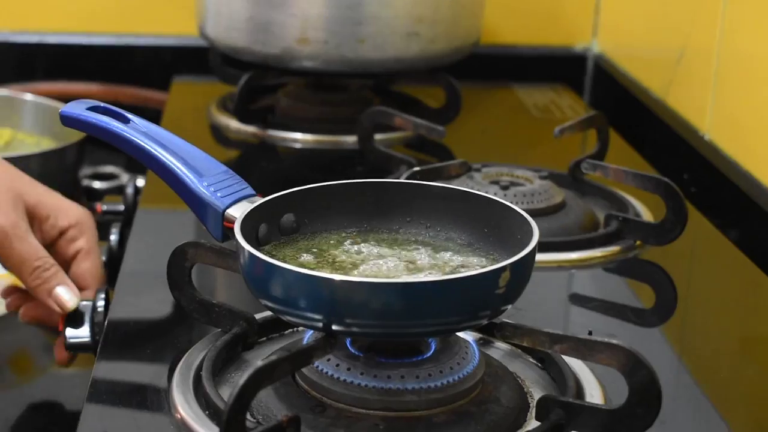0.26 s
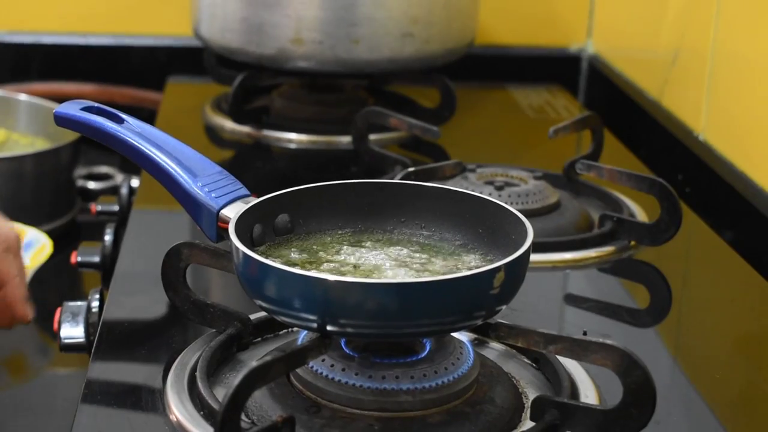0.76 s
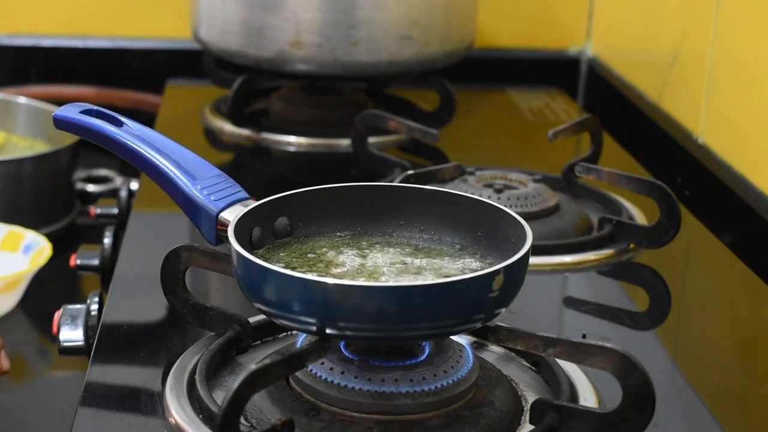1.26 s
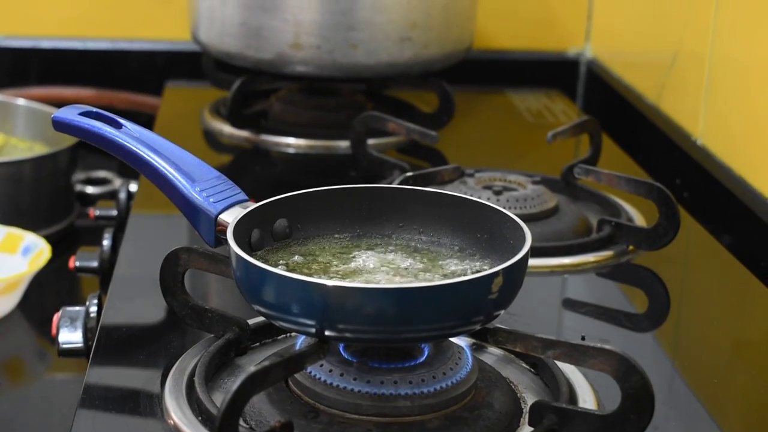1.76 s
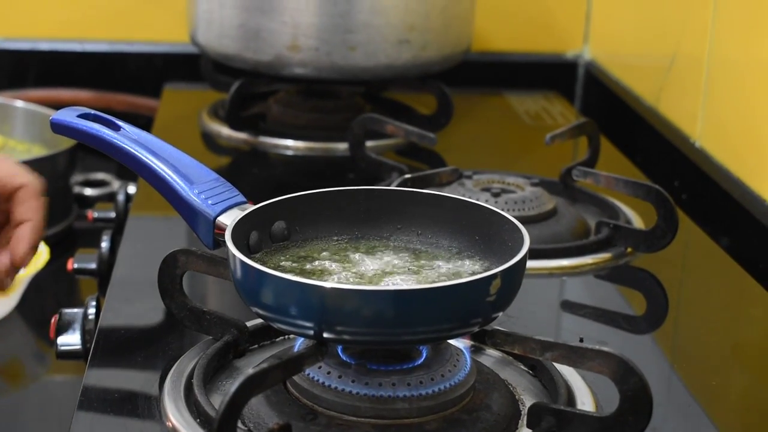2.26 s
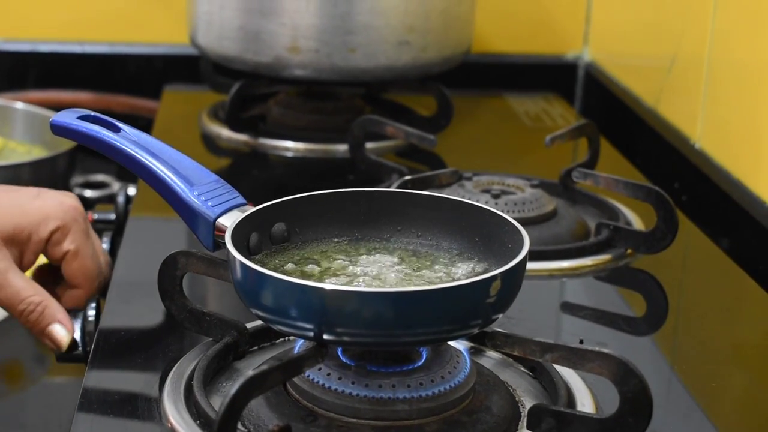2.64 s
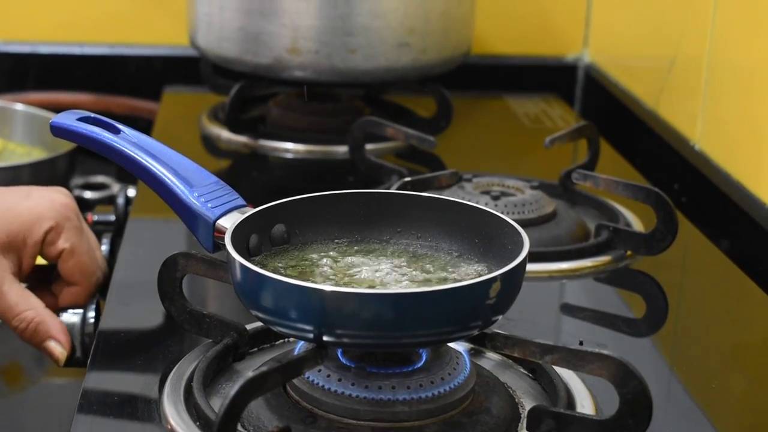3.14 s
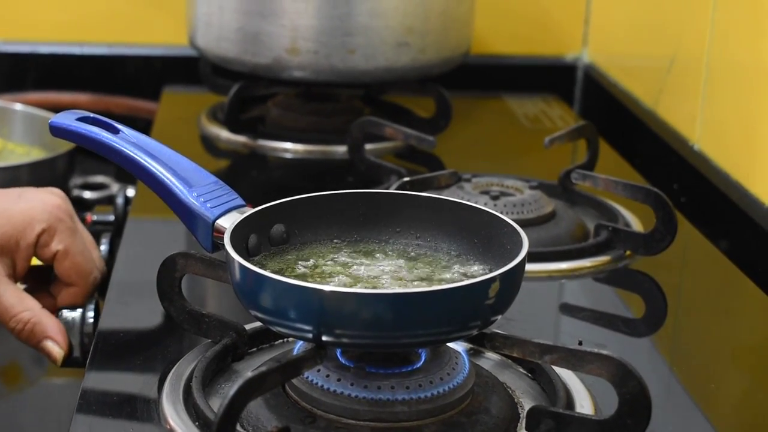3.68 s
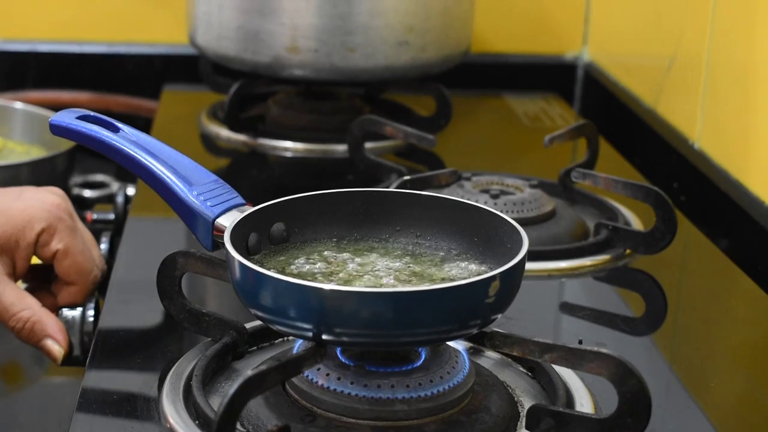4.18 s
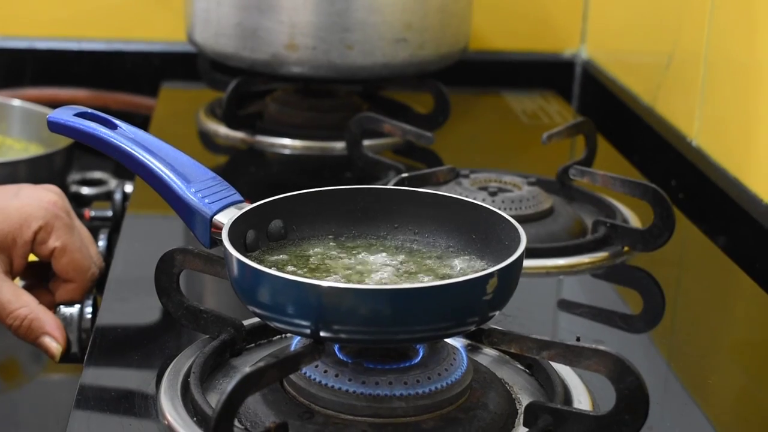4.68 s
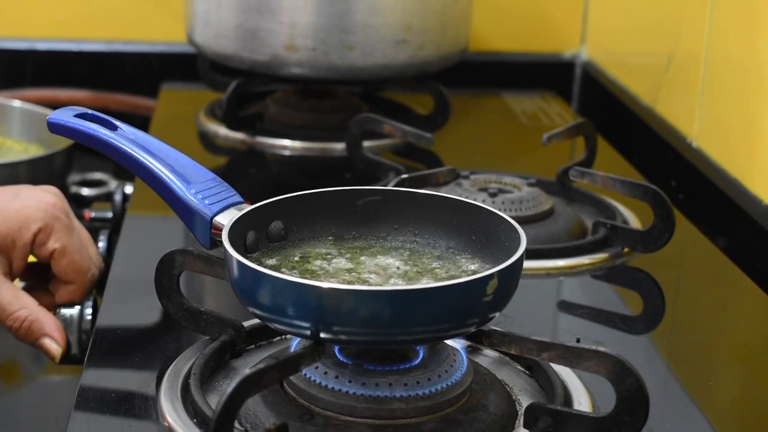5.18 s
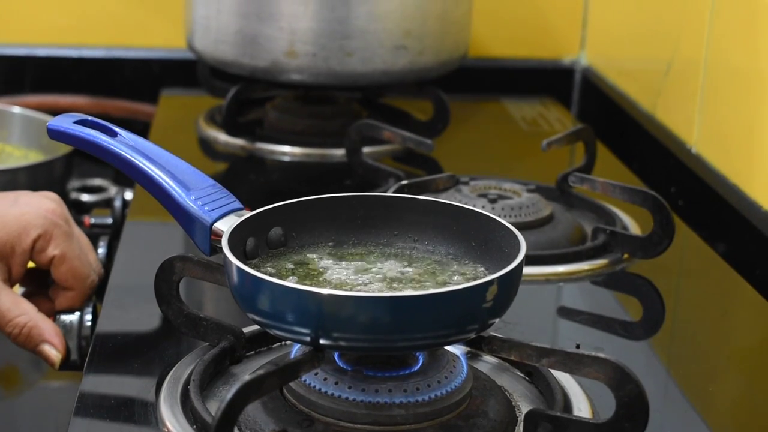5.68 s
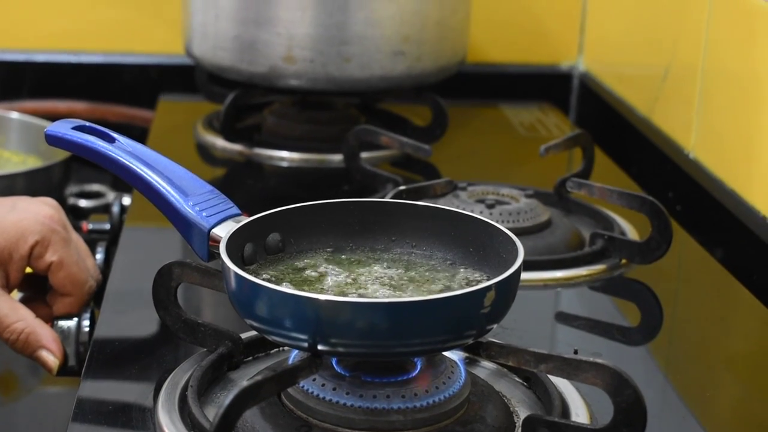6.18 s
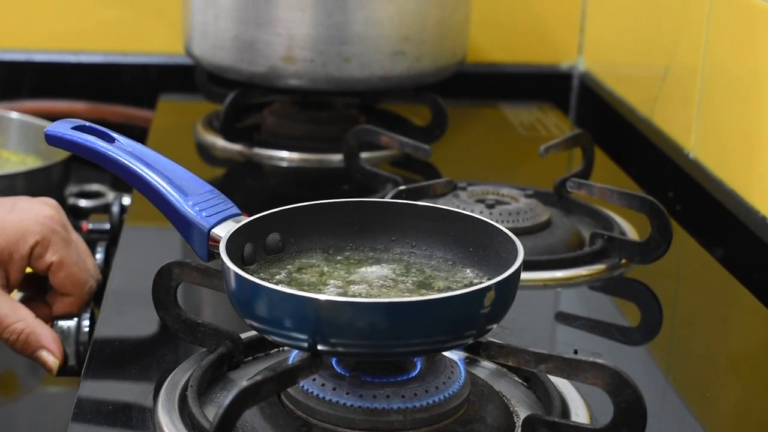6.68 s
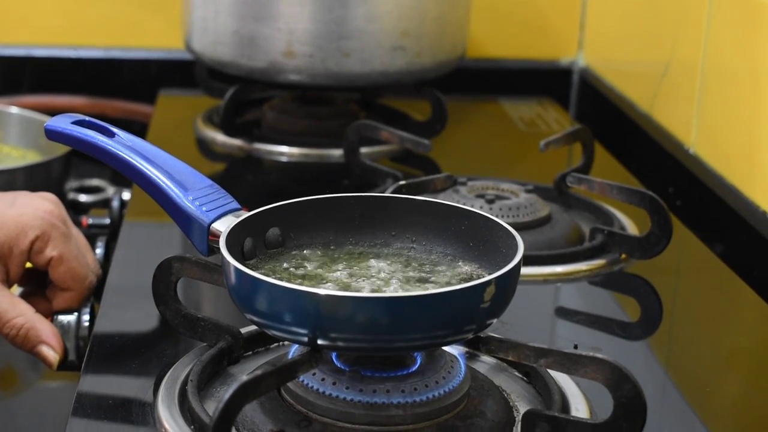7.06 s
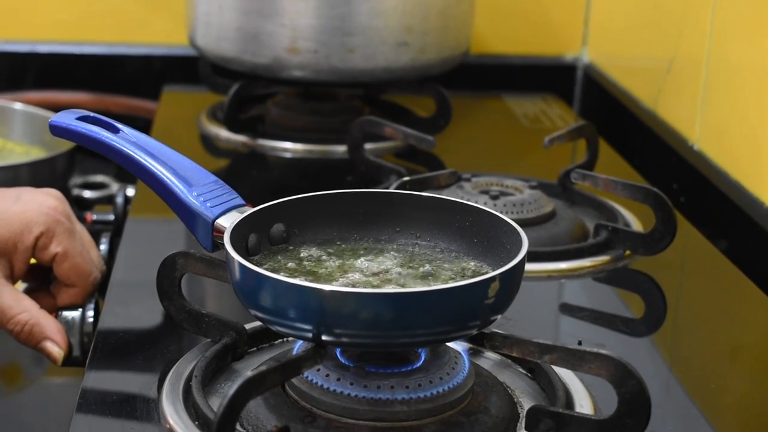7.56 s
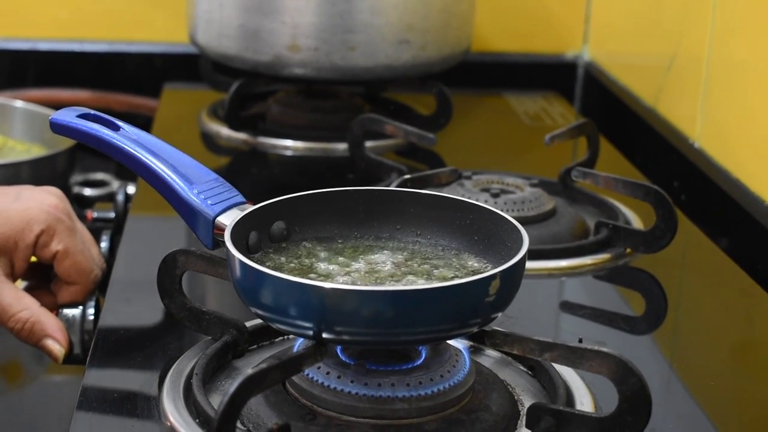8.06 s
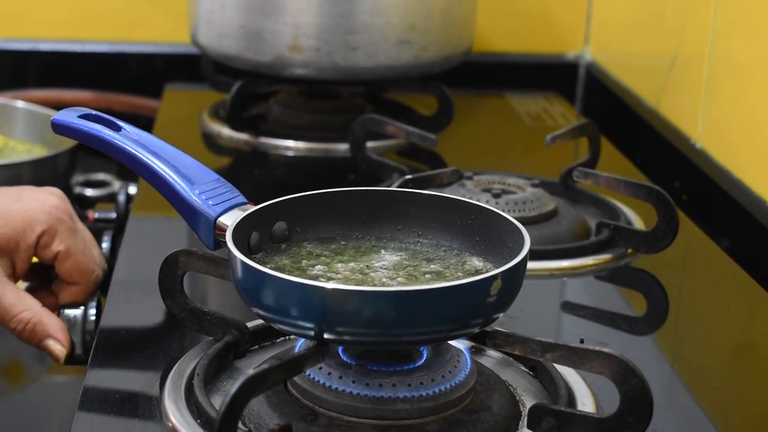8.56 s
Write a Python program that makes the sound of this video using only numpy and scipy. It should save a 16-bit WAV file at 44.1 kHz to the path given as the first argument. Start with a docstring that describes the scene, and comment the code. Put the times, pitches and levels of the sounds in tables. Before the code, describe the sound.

A gas flame rushes softly with a light hiss and a very faint hum, heard close up in a tiled kitchen. At about 0.3 seconds seeds start to crackle in hot oil, and a fine sizzle rises as the gas hiss drops away. Sharp, bright pops come irregularly, several a second, each ringing briefly in the small pan, with weaker crackles and tiny spits between them. Strong cracks stand out near 1.4, 3.1 and 4.4 seconds. A quick cluster of dull, quiet knocks sounds beside the stove at about 2 seconds, and a fainter one near 3. From about 5 to 7.5 seconds the gas whistles faintly as it is turned low, then returns to a slight hiss. The sizzle and small crackles gradually thin, but distinct pops continue, with sharp ones near 7 and 8 seconds, until the end at almost 9 seconds.

```python
"""A gas flame rushes softly over a faint hum; then seeds crackle in hot oil, close by in a tiled kitchen.
Each seed splits with a crack, its steam bubble rings in the oil, and the bowl of the small pan answers.
Weaker seeds, tiny spits and a fine sizzle fill the gaps and die down as the seeds dry.
The gas hisses or faintly whistles as the knob is turned, and a few dull knocks sound beside the stove."""
import sys
import numpy as np
from scipy import signal
from scipy.fft import rfft, irfft, next_fast_len
from scipy.io import wavfile

SR = 44100
rng = np.random.default_rng(int(sys.argv[2]) if len(sys.argv) > 2 else 0)


def log_audio(samples):
    """Write samples as a 16-bit WAV file to the path given in sys.argv[1]."""
    # one column per channel
    frames = np.atleast_2d(samples).T
    # limit to full scale, then quantise
    limited = np.clip(frames, -1, 1)
    pcm = np.round(limited * 32767).astype(np.int16)
    wavfile.write(sys.argv[1], SR, pcm)


N = 388962
TIME = np.arange(N) / SR
SEEDS_IN_S, FOAM_UP_S = 0.29, 0.17
TOP_HZ, TOP_AT_DB, TOP_DB_PER_OCTAVE = 10760, -13.5, 20  # a harder burst is quicker and reaches higher


def amp(db):
    """Decibels to amplitude ratio."""
    return 10 ** (np.asarray(db) / 20)


def unit_rms(x):
    """Normalises power to rms 1."""
    return x / np.sqrt(np.mean(x ** 2) + 1e-20)


def unit_burst(x):
    """Normalises energy to that of one millisecond at rms 1."""
    return x * np.sqrt(SR / 1000 / (np.sum(x ** 2) + 1e-20))


def curve_at(points, hz):
    """Interpolates along a log-frequency axis."""
    freq_hz, value = np.transpose(points)
    return np.interp(np.log(hz + 1), np.log(freq_hz), value)


def add(mix, start_s, sound):
    """Superposition: sums a sound into the mix."""
    part = mix[max(round(start_s * SR), 0):][:len(sound)]
    part += sound[:len(part)]


def coloured(x, spectrum):
    """Spectral shaping: filters x by a level curve, at rms 1."""
    size = next_fast_len(N)
    gain = amp(curve_at(spectrum, np.fft.rfftfreq(size, 1 / SR)))
    return unit_rms(irfft(rfft(x, size) * gain, size)[:N])


def burner(flame_db=-50.0, hiss_db=-47, hiss_power=1.3, whistle_db=-43.5, choke_db=43):
    """Flow noise: the flame is steady; the gas hisses with the valve open and whistles when nearly shut."""
    # noise spectra of flame and room, open valve and nearly shut valve: freq_hz, relative_db
    flame_spectrum = [(20, -31), (50, -21), (100, -17), (160, -8), (195, -1), (290, -2.5), (470, 5.5),
                      (560, 1), (690, 6), (850, 0), (1300, -4), (3000, -8), (8000, -26), (16000, -25)]
    hiss_spectrum = [(300, -32), (1400, -10), (1850, -2.5), (2300, -12.5), (4000, -12), (5900, -15.5),
                     (6400, -7), (7000, -12), (7900, -3.5), (8800, -10), (10500, -14), (13000, -19),
                     (16000, -32)]
    whistle_spectrum = [(1000, -27), (3000, -17), (3440, 0), (3750, 4), (4050, -20), (4500, -6),
                        (5400, -14), (16000, -51)]
    # the knob is turned down, nudged up, turned low and up again: time_s, opening_fraction
    valve = [(0, 0.95), (.3, 1), (.6, 0.18), (4.6, .3), (5, 0.09), (5.6, 0.01), (7.5, 0.09), (8.8, 0.4)]
    opening = np.clip(np.interp(TIME, *np.transpose(valve)), 0, 1)
    noise = rng.standard_normal((3, N))
    flame = amp(flame_db) * coloured(noise[0], flame_spectrum)
    hiss = amp(hiss_db) * opening ** hiss_power * coloured(noise[1], hiss_spectrum)
    whistle = amp(whistle_db - choke_db * opening) * coloured(noise[2], whistle_spectrum)
    return flame + hiss + whistle


def hum(drift_points=60):
    """Phase modulation: the low tones of an appliance wander a few times a second."""
    # partials of the hum: pitch_hz, level_db
    partials = [(99, -81), (146, -77), (197, -68), (243, -67.5), (344, -65), (463, -64.5), (689, -65)]
    drift = signal.resample(rng.standard_normal((len(partials), drift_points)), N, axis=1)
    return sum(amp(db) * unit_rms(np.sin(2 * np.pi * hz * TIME + phase))
               for (hz, db), phase in zip(partials, drift))


def frying(bare_oil_db=-25, drying_db_per_s=0.73):
    """Evaporation envelope: the oil foams up as the seeds go in, then calms exponentially as they dry."""
    since_s = TIME - SEEDS_IN_S
    foam = np.clip(since_s / FOAM_UP_S, 0, 1) ** 2
    return amp(bare_oil_db) + foam * amp(-drying_db_per_s * since_s)


def sizzle(db=-46.0, per_s=1500):
    """Shot noise: countless foam bubbles burst as fine, independent clicks."""
    # spectrum of the foam: freq_hz, relative_db
    foam_spectrum = [(300, -54), (900, -0.5), (1300, -1.5), (1570, 0.5), (2000, -1.5), (2800, -2.5),
                     (3600, -9), (4500, -5.5), (5600, -12), (7500, -7.5), (10000, -6), (13000, -10),
                     (16000, -14.5)]
    clicks = rng.choice([-1, 1], N) * (rng.random(N) < per_s / SR)
    return amp(db) * coloured(clicks, foam_spectrum) * frying()


def crack(hz, top_hz, q=1.0, tear_s=0.00079, snap=0.93, flattening=0.75, size=400):
    """Brittle fracture: the husk snaps and tears in a broadband pulse; a slow break lacks the top treble."""
    t = np.arange(size) / SR
    tear = rng.standard_normal(size) * np.exp(-t / tear_s)
    tear[0] = snap
    spectrum = rfft(tear, 4 * size)
    spectrum /= (abs(spectrum) + 1e-9) ** flattening
    freq_hz = np.fft.rfftfreq(4 * size, 1 / SR) + 1
    husk_resonance = 1 / (1 + 1j * q * (freq_hz / hz - hz / freq_hz))
    s = 1j * freq_hz / top_hz
    lowpass = 1 / ((s + 1) * (s ** 2 + s + 1))
    return unit_burst(irfft(spectrum * husk_resonance * lowpass)[:size])


def bubble(hz, glide=0.0058, swell_cycles=0.28, decay_cycles=2.3, size=600):
    """Damped oscillator: a steam bubble swells, rings briefly and rises a little in pitch as it opens."""
    cycles = hz * np.arange(size) / SR
    fade = np.exp(-cycles / decay_cycles)
    swell = 1 - np.exp(-cycles / swell_cycles)
    return unit_burst(np.sin(2 * np.pi * cycles * (1 - glide * fade)) * fade * swell)


def bowl(rise_s=0.00056, damped_s=0.05, spread_db=2.5, oil_detune=0.022, size=6000):
    """Modal ringing: the seed's random place weights the pan's modes; moving oil detunes the damped ones."""
    # damped modes of the oil-filled bowl, then the longer ring of the wall: pitch_hz, level_db, t60_s
    pan_modes = [(1529, 1, 0.021), (1612, 1, 0.017), (1849, -2.5, 0.013), (1158, -12.5, 0.026),
                 (1290, -6.5, 0.01), (3516, -11, 0.017), (1498, -23.5, 0.11), (1577, -25.5, 0.35),
                 (2442, -22.5, 0.2), (1032, -28.5, 0.2)]
    hz, db, t60 = np.transpose(pan_modes)[:, :, None]
    t = np.arange(size) / SR
    weight, phase, detune = rng.standard_normal((3, len(pan_modes), 1))
    hz = hz * (1 + oil_detune * detune * (t60 < damped_s))
    modes = amp(db + spread_db * weight - 60 * t / t60) * np.sin(2 * np.pi * hz * t + phase)
    return unit_burst(modes.sum(0) * (1 - np.exp(-t / rise_s)))


def pop(db, hz, bubble_share, bowl_db, thin_rise=2.24):
    """Energy partition: one burst is shared between crack and bubble, and the pan answers."""
    share = np.clip(bubble_share, 0.02, 0.97)
    crack_hz = hz * (1 + thin_rise * share ** 2)  # more bubble leaves a thinner, higher crack
    top_hz = max(hz, TOP_HZ * 2 ** ((db - TOP_AT_DB) / TOP_DB_PER_OCTAVE))
    sound = amp(bowl_db) * bowl()
    add(sound, 0, amp(db) * np.sqrt(1 - share) * crack(crack_hz, top_hz))
    add(sound, 0, amp(db) * np.sqrt(share) * bubble(hz))
    return sound


def loud_seeds(place_count=7):
    """Point sources: the loud pops are dealt out over places in the pan, one track for each."""
    # bursting seeds, levels at the source: start_s, level_db, pitch_hz, bubble_share, bowl_db
    bursts = [(0.3009, -21.5, 6090.0, 0.88, -47), (0.4446, -18, 11670.0, 0.13, -32),
              (0.4891, -22.5, 3330, 0.2, -25.5), (0.5371, -22, 1910, 0.16, -19),
              (0.5755, -18, 2930, 0.9, -20.0), (0.5838, -15, 1920, 0.1, -19), (0.6075, -31, 3350, 0.8, -19),
              (0.7112, -27, 4040.0, 0.05, -22), (0.874, -19.5, 3520.0, 0, -25),
              (0.9202, -19.5, 2770.0, 0.06, -25), (0.9515, -21, 3290.0, 0.86, -38),
              (0.9619, -19.0, 3180.0, 0.93, -17), (1.0767, -23.5, 3500, 1, -29),
              (1.1062, -19.5, 3320, 0, -17.5), (1.2146, -15.5, 3180.0, 0, -24),
              (1.2781, -21.0, 3560, 0.95, -17), (1.3014, -14.5, 4790.0, 1, -22.5),
              (1.3675, -6.5, 3500, 0.14, -12), (1.3911, -15, 3400.0, 0.83, -21),
              (1.4945, -17, 2340, 0.1, -20), (1.577, -27, 3820, 0.3, -24.5),
              (1.7457, -22, 4180.0, 0.3, -32), (1.957, -10, 4000, 0.88, -27.5),
              (2.0157, -18, 2540, 0.66, -13), (2.1719, -23, 3520.0, 0.6, -17.5),
              (2.2022, -12.5, 3590, 0.99, -44.0), (2.3398, -21.5, 3440, 0.76, -24.5),
              (2.3749, -21.5, 2660, 0.2, -20.0), (2.5903, -24, 3380, 0.45, -22),
              (2.758, -18.5, 3550, 0.2, -21.5), (2.8097, -13, 2360, 0.73, -8.0),
              (2.9155, -12.5, 3780, 0.94, -24.5), (3.1428, -5.5, 3120, 0.84, -19),
              (3.2525, -15.5, 3500, 0.45, -23.0), (3.2719, -20, 4180.0, 0.5, -14.5),
              (3.2972, -9, 4400, 0.18, -29), (3.418, -27, 5130.0, 0.5, -42),
              (3.5079, -12.0, 3460, 0.74, -14.5), (3.6288, -22.5, 2030.0, 0, -24.5),
              (3.6906, -23.5, 3480, 0.76, -24.5), (3.9613, -22.5, 4070, 0.5, -12.5),
              (4.1476, -21.5, 3470, 0.6, -25.5), (4.1918, -26.5, 2580, 0.9, -17.5),
              (4.2599, -13.5, 3730, 0.61, -26), (4.3814, -8, 10300, 0.25, -44.0),
              (4.4805, -15.0, 2430, 0.3, -16), (4.6056, -27, 3830, 0.2, -21),
              (4.7671, -21.0, 3960, 0.18, -23.0), (4.8728, -13, 12500.0, 0.25, -19),
              (5.0434, -16.0, 4000, 0.45, -30), (5.1503, -9.5, 3420, 0.96, -22.5),
              (5.2377, -12, 4000, 0.81, -30), (5.3626, -20.5, 4860, 0.64, -24.5),
              (5.3885, -13, 12200, 0.05, -17.5), (5.7166, -12.0, 4100, 0.19, -26),
              (6.0006, -20.5, 4060, 0.55, -17.0), (6.1009, -15, 3630, 0.27, -21.5),
              (6.2094, -20.5, 3700, 0.8, -19), (6.3547, -26.5, 3450, 0.7, -21),
              (6.5475, -24.5, 3870, 0.8, -28.5), (6.6468, -22.0, 2500.0, 0.87, -21.5),
              (6.8753, -16.5, 3520, 0.23, -18.5), (6.907, -21.0, 5800, 0.5, -11.0),
              (6.9931, -20, 3520.0, 0.8, -15.5), (7.0379, -9.5, 5270, 0.34, -19),
              (7.4941, -18, 3770.0, 0.8, -22.5), (7.6232, -18, 3450, 0.84, -14.5),
              (7.6894, -18.5, 2750, 0.56, -11), (7.7414, -19, 2290, 0.56, -13.5),
              (7.8326, -26, 2900, 0.76, -18.5), (8.0013, -9.5, 6450, 0.1, -44.0),
              (8.0983, -10.0, 3560, 0.53, -46), (8.1167, -7, 12400, 0.15, -41),
              (8.2385, -19.0, 3520.0, 0.83, -14.5), (8.4256, -22, 4060, 1, -20.5),
              (8.5142, -28, 2560, 0.94, -18), (8.7674, -19.5, 3430, 0.6, -47),
              (8.8058, -24.5, 6400, 0.5, -17)]
    places = np.zeros((place_count, N))
    for k, (start_s, *burst) in enumerate(bursts):
        add(places[k % place_count], start_s, pop(*burst))
    return places


def spits(per_s=20, db=-40.5, spread_db=3.5, low_hz=2200, high_hz=11000, tries=400):
    """Flash boiling: specks of moisture pop at random times and pitches, louder the harder the oil fries."""
    out, vigour = np.zeros(N), frying()
    kinds = [pop(db, hz, bubble_share=0.95, bowl_db=db - 6) for hz in np.geomspace(low_hz, high_hz, 24)]
    for when, chance, kind, weakness in rng.random((tries, 4)):
        if chance < per_s * N / SR / tries:
            gain = amp(-spread_db * np.log(max(weakness, 0.05))) * vigour[int(when * N)]
            add(out, when * N / SR, gain * kinds[int(kind * len(kinds))])
    return out


def small_seeds(first_per_s=11, thinning_s=9.0, db=-29, bowl_db=-29, spread_db=2.0,
                hz=4000, spread_octaves=0.51, count=120):
    """Depletion: weaker seeds pop at random, more and more rarely as they are used up."""
    out, start_s = np.zeros(N), SEEDS_IN_S + FOAM_UP_S
    for (wait, share), (loud, pitch, place) in zip(rng.random((count, 2)), rng.standard_normal((count, 3))):
        start_s += 2 * wait * np.exp(start_s / thinning_s) / first_per_s
        if start_s > TIME[-1]:
            break
        pitch_hz = min(hz * 2 ** (spread_octaves * pitch), TOP_HZ)
        add(out, start_s, pop(db + spread_db * loud, pitch_hz, share, bowl_db + spread_db * place))
    return out


def knocks(ring_s=0.0024, size=4000):
    """Heavy damping: soft blows swell and die within a few cycles."""
    # dull knocks beside the stove: start_s, gain_db, pitch_hz
    blows = [(2.059, -30.5, 286), (2.080, -34, 236), (2.090, -31.5, 439), (2.93, -47, 125)]
    out, t = np.zeros(N), np.arange(size) / SR
    envelope = (t / ring_s) ** 2 * np.exp(-t / ring_s)
    for start_s, db, hz in blows:
        add(out, start_s, amp(db) * np.sin(2 * np.pi * hz * t) * envelope)
    return out


def radiated(x, low_hz=1040, leak_db=-26):
    """Radiation efficiency: sources much smaller than the wavelength give off almost no bass."""
    treble = signal.sosfilt(signal.butter(6, low_hz, "high", fs=SR, output="sos"), x)
    return treble + amp(leak_db) * x


def kitchen(x, build_s=0.0011, wander_s=0.0003, size=22050):
    """Room response: direct sound, early echoes that shift for each source, and a tail dying by band."""
    # reverberation time of the kitchen: freq_hz, t60_s
    decay_times = [(250, 0.36), (1500, 0.32), (3500, 0.42), (7000, 0.27), (11000, 0.28), (16000, 0.15)]
    # reflections off stove top, pots and tiles: delay_s, level_db
    echoes = [(.0021, -16), (.0039, -17), (.0078, -17), (.0087, -17), (.0122, -19), (.0165, -20),
              (.0193, -19), (.0252, -19)]
    t = np.arange(size) / SR
    taps = rng.choice([-1, 1], size) * (rng.random(size) < 0.25) * (1 - np.exp(-t / build_s))
    hz, frame_s, bands = signal.stft(taps, SR, nperseg=256)
    decay = amp(-60 * frame_s / curve_at(decay_times, hz)[:, None])
    tail = signal.istft(bands * decay, SR)[1][:size]
    response = tail / np.linalg.norm(tail)
    response[0] += 1  # direct sound, equal in energy to the tail
    for delay_s, db in echoes:
        add(response, abs(delay_s + wander_s * rng.standard_normal()), amp([db]))
    return signal.oaconvolve(x, response)[:N]


def scene():
    """Superposition: pan and knocks reverberate over burner and hum, the same in both channels."""
    popping = sum(kitchen(place) for place in loud_seeds())
    crackling = small_seeds() + spits() + sizzle()
    mono = radiated(popping) + kitchen(radiated(crackling) + knocks()) + burner() + hum()
    return np.array([mono, mono])


def record(dry, top_hz=15000, ceiling=0.97, edge_hz=16050):
    """Bandwidth and overload: the microphone loses the top treble and clips peaks; a band limit follows."""
    softened = signal.sosfilt(signal.butter(4, top_hz, fs=SR, output="sos"), dry)
    clipped = np.clip(softened, -ceiling, ceiling)
    band_limit = signal.firwin(255, edge_hz, window=("kaiser", 8), fs=SR)
    return signal.oaconvolve(clipped, band_limit[None], "same")


dry = scene()
out = record(dry)
log_audio(out)
```